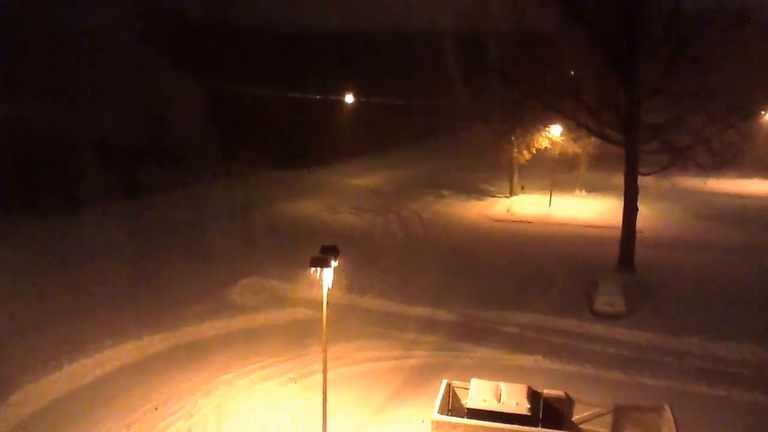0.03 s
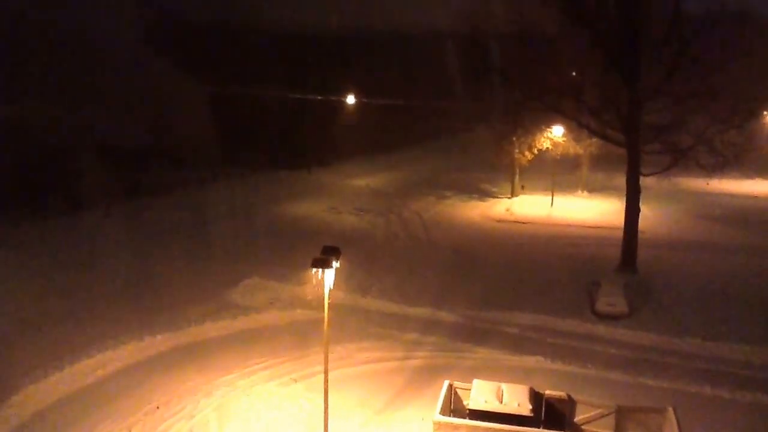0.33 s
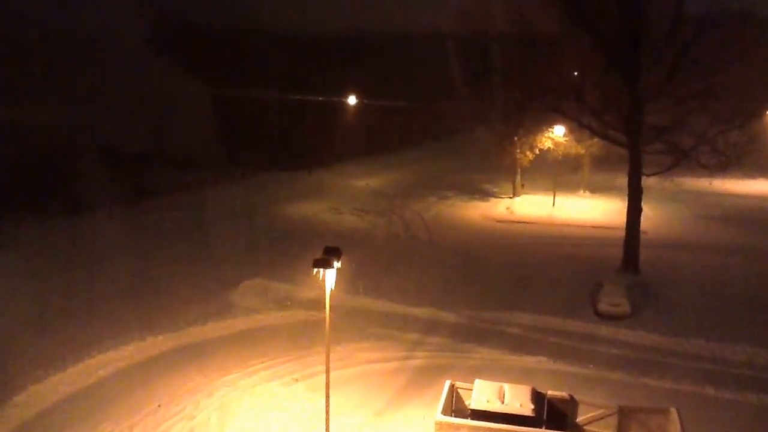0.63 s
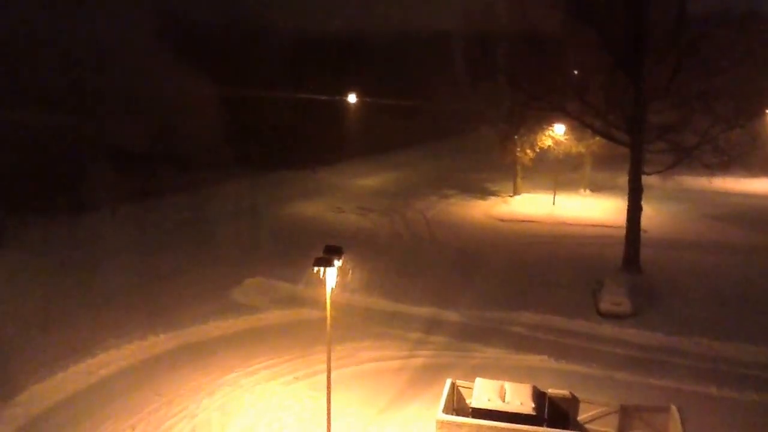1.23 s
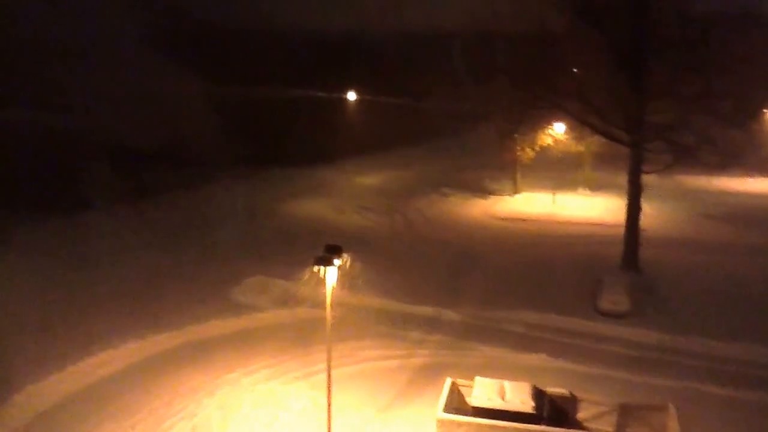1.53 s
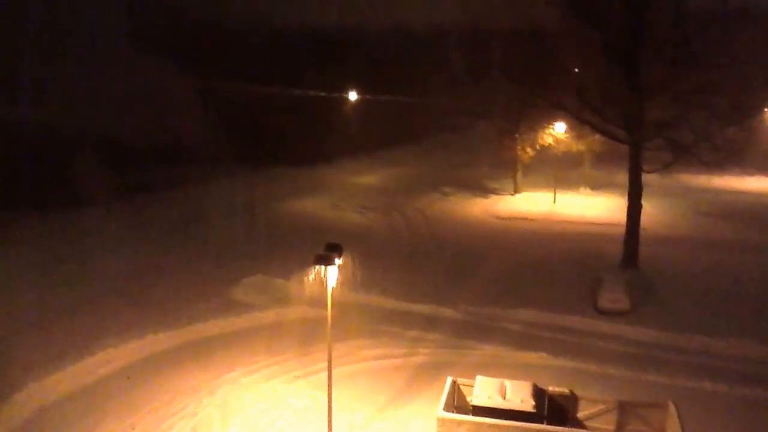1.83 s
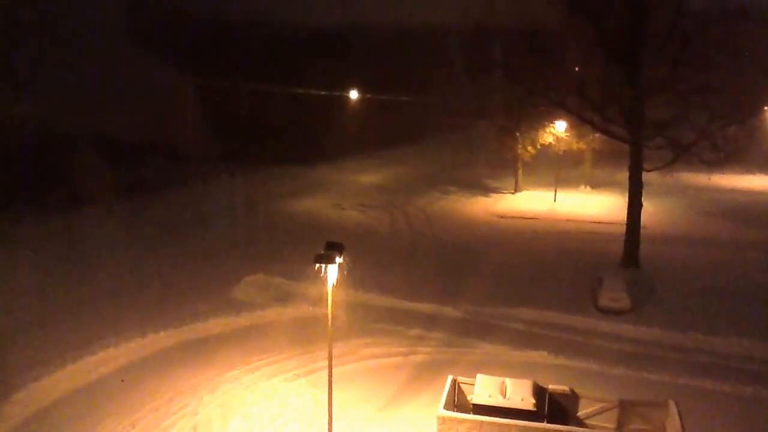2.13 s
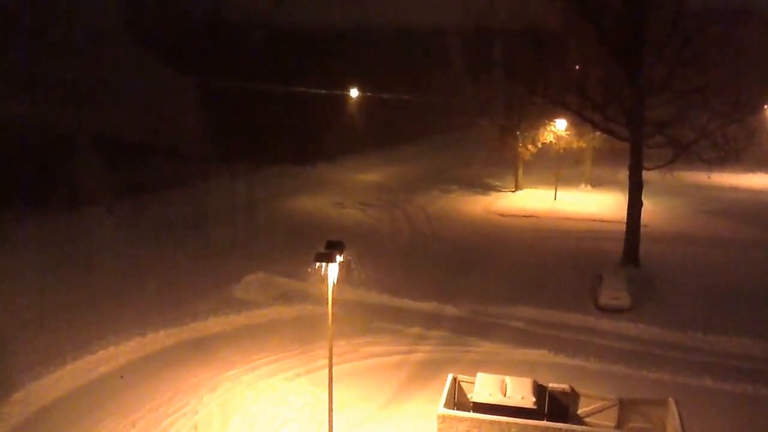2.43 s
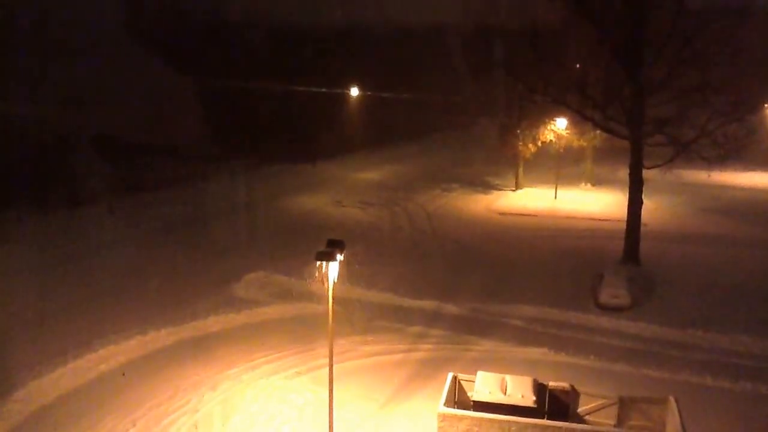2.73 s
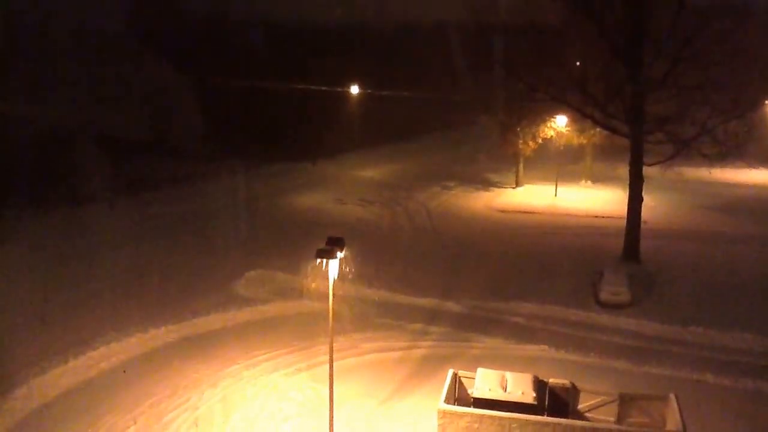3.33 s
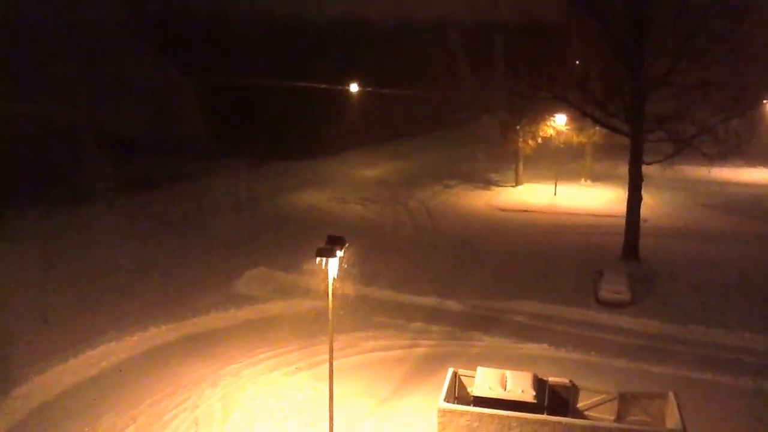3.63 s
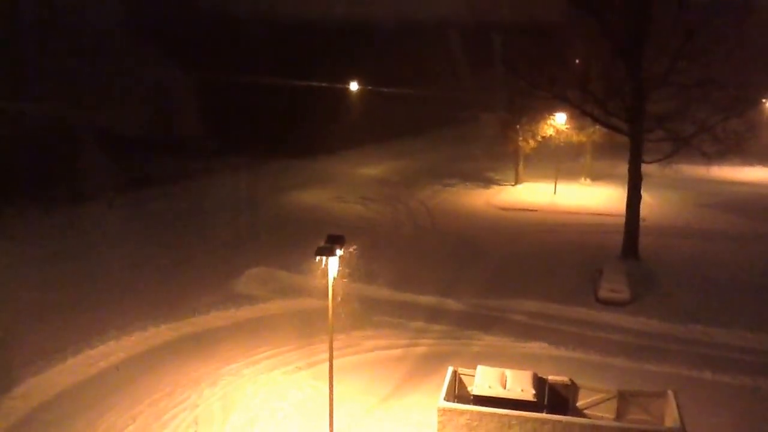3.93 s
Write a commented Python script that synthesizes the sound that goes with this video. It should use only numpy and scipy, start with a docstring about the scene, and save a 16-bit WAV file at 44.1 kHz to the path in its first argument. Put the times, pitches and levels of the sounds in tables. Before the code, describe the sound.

Ice pellets hiss and crackle on a window pane, sparse at first, then thicker and harder as the wind rises. The indoor microphone also picks up a soft wind roar, a faint breathy hum and a steady low room rumble.

```python
"""Sleet fizzes and ticks against a window at night, heard from indoors, with wind behind it.
Each gust throws more and harder ice pellets: fine ones fizz on the glass, bigger ones tick,
knock on the frame and make the pane ring. The wind roars softly outside and hums in the
window gap, over the low rumble of a small room."""
import sys
import numpy as np
from scipy import signal
from scipy.fft import rfft, irfft
from scipy.io import wavfile
from scipy.ndimage import uniform_filter1d

SR = 44100
rng = np.random.default_rng(int(sys.argv[2]) if len(sys.argv) > 2 else 0)


def persist_wave(psi):
    """Save psi, clipped to +-1, as 16-bit WAV."""
    counts = np.round(np.clip(psi, -1, 1) * 32767).astype(np.int16)
    wavfile.write(sys.argv[1], SR, np.atleast_2d(counts).T)


N = 176400  # 4 seconds
TIME = np.arange(N) / SR
LOW_CUT_HZ, TREBLE_LIMIT_HZ = 75, 15330


def amp(db):
    """Turns decibels into a number to multiply a sound by."""
    return 10 ** (np.asarray(db) / 20)


def unit(x):
    """Scales a signal so that its average size (rms) is 1."""
    return x / np.sqrt(np.mean(x ** 2) + 1e-20)


def curve(table, column=1):
    """Turns one dB column of a table into a volume that changes over time."""
    table = np.array(table)
    return amp(np.interp(TIME, table[:, 0], table[:, column]))


def add(mix, start_s, sound):
    """Mixes a sound in at the given time."""
    part = mix[max(round(start_s * SR), 0):][:len(sound)]
    part += sound[:len(part)]


def colour(x, points, size=8192):
    """Shapes the tone with (pitch, level) points; white noise keeps its overall power."""
    hz, db = np.transpose(points)
    log_hz = np.log(abs(np.fft.fftfreq(size, 1 / SR)) + 1)
    log_gain = np.log(amp(np.interp(log_hz, np.log(hz), db)))
    spectrum = np.exp(np.conj(signal.hilbert(log_gain)))  # rings after a hit, never before
    taps = np.fft.ifft(spectrum).real[:size // 2]
    return signal.fftconvolve(x, taps / np.linalg.norm(taps))[:len(x)]


def waver(rate_hz):
    """A smooth random wobble, up to about rate_hz fast."""
    hz = np.fft.rfftfreq(N, 1 / SR)
    slow_part = np.exp(-(hz / rate_hz) ** 2) * hz / (hz + 2)
    return unit(irfft(rfft(rng.standard_normal(N)) * slow_part, N))


def band(hz, octaves, size=2048):
    """A short piece of noise around one pitch."""
    away = np.log2((np.fft.rfftfreq(size, 1 / SR) + 1) / hz) / octaves
    phases = np.exp(2j * np.pi * rng.random(len(away)))
    return unit(irfft(phases / (1 + away ** 2 / 2) ** 2, size))


def impacts(drive, peak_per_s, spread_db, rate_share=0.3):
    """Random hits that follow the gusts; rate_share of a rise in dB is more hits, the rest harder ones."""
    density = (drive / drive.max()) ** (2 * rate_share)
    sizes = amp(spread_db * np.minimum(rng.exponential(1, N), 3.5))
    chance = np.minimum(peak_per_s * density / SR, 1)
    hits = rng.choice([-1, 1], N) * (rng.random(N) < chance)
    return drive * unit(sizes) * hits / np.sqrt(chance)


def tick(hz, octaves, crack_s, scatter_db):
    """One pellet: a short crack as it crumbles, then a scatter of splinters."""
    rise_s, fade_s = 0.0026, 0.0063
    noise = band(hz, octaves)
    t = np.arange(len(noise)) / SR
    crack = t / crack_s * np.exp(1 - t / crack_s)
    scatter = amp(scatter_db) * np.minimum(t / rise_s, 1) * np.exp(-t / fade_s)
    return noise * (crack + scatter)


def shatter(hits, octaves, low_hz, count=64):
    """Pellets break up: every hit gets one of many ticks, each at its own pitch."""
    which, out = rng.integers(0, count, N), np.zeros(N)
    for k, hz in enumerate(np.linspace(low_hz, TREBLE_LIMIT_HZ, count)):
        grain = tick(hz, octaves, crack_s=0.00098, scatter_db=-3.5)
        out += signal.oaconvolve(hits * (which == k), grain / np.linalg.norm(grain))[:N]
    return out


def sleet():
    """Fine ice fizzes and coarser grains crackle on the glass; the frame patters and the pane rings."""
    # how hard the sleet is driven (time [s], level on the glass [dB], level on the frame [dB])
    gusts = [(0, -47.5, -65), (0.35, -52.5, -70), (0.55, -53.5, -85), (0.68, -60.5, -72), (0.9, -56.5, -78),
             (0.92, -52, -64), (1.02, -46.5, -54), (1.2, -46, -56.5), (1.42, -40, -48.5), (1.7, -40, -50),
             (1.88, -38.5, -46.5), (2.08, -37.5, -48), (2.3, -40, -47), (2.48, -35.5, -44),
             (2.8, -40.5, -48.5), (3.0, -41.5, -52.5), (3.3, -40.5, -47.5), (3.38, -35, -46.5),
             (3.52, -42, -48), (3.74, -43.5, -53), (3.87, -41, -56), (4.0, -40.5, -46.5)]
    # tone of the glass under sleet (pitch [Hz], relative level [dB])
    glass_tone = [(300, -43), (1800, -16.5), (3000, -8), (4400, -4), (6200, -1.5), (8200, -1.5), (9700, -2),
                  (11500, -4), (13300, -8.5), (15200, -9.5)]
    # tone of the frame under sleet (pitch [Hz], relative level [dB])
    frame_tone = [(90, -20), (700, -17), (1600, -7.5), (2050, -11.5), (2400, 1), (2750, -4), (3150, -5.5),
                  (3450, -3), (4600, -8.5), (8000, -11)]
    on_glass, on_frame = curve(gusts, column=1), curve(gusts, column=2)
    flurries = amp(1.55 * waver(rate_hz=30))  # the fine ice arrives in quick little bursts
    fizz = amp(-3.5) * flurries * impacts(on_glass, peak_per_s=20000, spread_db=3.0)
    coarse_hits = impacts(on_glass, peak_per_s=1200, spread_db=3.0)
    crackle = amp(-6) * shatter(coarse_hits, octaves=0.5, low_hz=5750)
    glass = colour(fizz + crackle, glass_tone)
    frame_hits = impacts(on_frame, peak_per_s=1700, spread_db=3.5)
    patter = colour(shatter(frame_hits, octaves=3.6, low_hz=2000), frame_tone)
    return glass + amp(-1) * patter + amp(-11) * pane(frame_hits)


def pane(hits):
    """Each pellet lands somewhere else, so it rings its own mix of the pane's notes."""
    # the notes the pane rings at (pitch [Hz], relative level [dB], time to fade by 60 dB [s])
    notes = [(1953, -6.5, 0.03), (2210, -0.5, 0.02), (2400, -2, 0.011), (2790, -5, 0.015),
             (3370, -3, 0.015), (6140, -2, 0.032), (9240, 1.5, 0.017)]
    t, out = np.arange(SR // 10) / SR, np.zeros(N)
    for hz, db, fade_s in notes:
        ring = amp(-60 * t / fade_s) * np.sin(2 * np.pi * hz * t)
        strikes = hits * rng.standard_normal(N)
        out += amp(db) * signal.oaconvolve(strikes, ring / np.linalg.norm(ring))[:N]
    return out


def wind():
    """A soft roar outside, and a breathy hum in the window gap that swells in puffs."""
    # strength of the wind (time [s], level [dB])
    wind_levels = [(0, -64), (0.85, -63), (1.15, -58), (1.4, -54.0), (1.65, -52.5), (2.0, -55), (2.55, -54),
                   (3.0, -57.5), (3.25, -56), (3.7, -58.5), (4.0, -57)]
    # tone of the roar (pitch [Hz], relative level [dB])
    roar_tone = [(25, -52), (70, -38), (130, -5.5), (220, -2), (290, -4), (370, -0.5), (520, -4.5),
                 (660, -6), (780, -4.5), (1200, -6.5), (1800, -12.5), (4000, -23.5)]
    # puffs that make the gap hum louder (time of the peak [s], length [s], level [dB])
    moans = [(1.46, 0.14, -70.5), (1.66, 0.29, -63), (3.202, 0.069, -56.5), (3.246, 0.056, -56),
             (3.986, 0.042, -61)]
    gap_hz, gap_width_hz, gap_db = 618.3, 44, -8
    strength = curve(wind_levels)
    flutter = amp(waver(rate_hz=14))
    roar = amp(3) * strength * flutter * colour(rng.standard_normal(N), roar_tone)
    roar *= (strength / strength.max()) ** 0.34  # quieter still between gusts
    puffs = sum(amp(db) * np.exp(-(2 * (TIME - s) / length) ** 2) for s, length, db in moans)
    phase = 2 * np.pi * gap_hz * TIME
    # two random wobbles blur the pure note into a breathy one
    hum = unit(waver(gap_width_hz) * np.cos(phase) + waver(gap_width_hz) * np.sin(phase))
    return roar + hum * (amp(gap_db) * strength + puffs)


def rumble():
    """The steady low rumble of the room."""
    # tone of the rumble (pitch [Hz], relative level [dB])
    rumble_tone = [(20, -39), (45, -15), (68, -20), (86, -11.5), (106, -12), (126, 5), (150, -4), (200, -3),
                   (290, -12.5), (360, -5.5), (500, -22.5), (930, -15.5), (1400, -22.5), (3000, -26.5),
                   (15000, -26.5)]
    return amp(-54.5) * colour(rng.standard_normal(N), rumble_tone)


def big_pellets():
    """Single large pellets tick on the glass or knock on the frame."""
    # ticks on the glass (time [s], level [dB], pitch [Hz], pitch spread [octaves], crack time [s])
    ticks = [ (.285, -45, 9050, .25, .0019), (0.323, -46, 6530, 0.94, 0.003),
             (.379, -39, 7650, 0.52, 0.0016), (.440, -46, 8000, .4, .002), (.570, -46, 9800, .25, 0.0013),
             (.642, -45, 7400, 0.54, 0.00087), (.711, -37.5, 8600, 0.48, 0.00072),
             (.765, -48, 10500, .25, .0007), (.909, -52.5, 4460, .3, .0035), (.912, -42, 8100, 0.52, .0018),
             (.943, -50, 7100, .4, 0.0022), (.965, -39.5, 9000, .95, .0019), (1.083, -42, 6460, 1, 0.0028),
             (1.181, -43, 8950, .31, 0.0019), (1.261, -41, 10500, .3, .0015),
             (1.328, -31.5, 7640, 0.7, .0016), (1.441, -36, 8500, .72, .001),
             (1.450, -35, 10600, .2, .0012), (1.53, -35.5, 9000, 0.61, 0.0012),
             (1.629, -34.5, 8400, 1, 0.0023), (1.747, -32, 8200, 0.8, 0.0026),
             (1.807, -39, 6000, 0.56, .0025), (1.875, -33.5, 9750, 0.38, 0.00088),
             (1.904, -37, 9330, .2, .0012), (1.949, -35, 7500, 0.74, 0.0015),
             (1.991, -39, 6250, 0.12, 0.00063), (2.056, -38, 9500, .35, .003),
             (2.077, -38.5, 5350, .09, 0.002), (2.219, -41, 9500, .4, .0012),
             (2.425, -37, 7000, 0.46, .002), (2.462, -42, 7500, 0.55, 0.0011),
             (2.520, -39, 9300, .35, 0.0024), (2.684, -36, 9580, 0.19, 0.0024),
             (2.907, -36, 6500, 0.38, .0014), (3.203, -32, 7000, 0.47, .0015),
             (3.347, -43, 9300, .35, 0.0025), (3.459, -38, 9100, .32, 0.0024),
             (3.778, -40, 9500, .5, .0015), (3.916, -39, 10400, .34, .0015),
             (3.982, -34.5, 9350, .27, 0.0014)]
    # knocks on the frame (time [s], level [dB], pitch [Hz])
    knocks = [(.256, -48, 3000), (.912, -56, 2700), (.969, -41, 2270), (1.238, -45, 2610),
              (1.454, -40.5, 2350), (1.529, -37.5, 2500), (1.752, -39, 2500), (1.776, -34, 2660),
              (1.868, -39, 2420), (1.953, -37, 2210), (2.517, -38, 2400), (2.657, -36.5, 2500),
              (3.206, -39.5, 2360), (3.78, -40, 2440), (3.914, -39.5, 2400)]
    knock_rise_s, knock_fade_s = 0.0015, 0.0056
    out = np.zeros(N)
    for start_s, db, hz, octaves, crack_s in ticks:
        add(out, start_s, amp(db) * tick(hz, octaves, crack_s, scatter_db=-11.5))
    for start_s, db, hz in knocks:
        noise = band(hz, octaves=0.3)
        t = np.arange(len(noise)) / SR
        loudness = np.minimum(t / knock_rise_s, 1) * np.exp(-t / knock_fade_s)
        add(out, start_s, amp(db) * noise * loudness)
    return out


def room(x, variants=5):
    """A small room with little echo; its echo keeps changing, blending between several different tails."""
    delay_s, fade_s, echo_db = 0.003, 0.16, -6
    t, echoes = np.arange(SR // 3) / SR, np.zeros(N)
    variant = np.repeat(rng.integers(0, variants, N // 256 + 1), 256)[:N]  # picked about every 6 ms
    for k in range(variants):
        tail = rng.standard_normal(len(t)) * (t > delay_s) * amp(-60 * t / fade_s)
        share = np.sqrt(abs(uniform_filter1d(1.0 * (variant == k), size=128)))  # blends smoothly between the tails
        echoes += signal.fftconvolve(x * share, tail / np.linalg.norm(tail))[:N]
    return x + amp(echo_db) * echoes


def scene():
    """Sleet and wind at the window, over the room's rumble, in one channel."""
    ice = room(sleet() + big_pellets())
    return (ice + wind() + rumble())[None]


def record(dry):
    """Takes away the deepest bass and the highest treble."""
    bass_cut = signal.butter(N=3, Wn=LOW_CUT_HZ, btype="high", fs=SR, output="sos")
    treble_cut = signal.firwin(1023, TREBLE_LIMIT_HZ, window=("kaiser", 8), fs=SR)
    return signal.oaconvolve(signal.sosfilt(bass_cut, dry), treble_cut[None], "same")


dry = scene()
out = record(dry)
persist_wave(out)
```